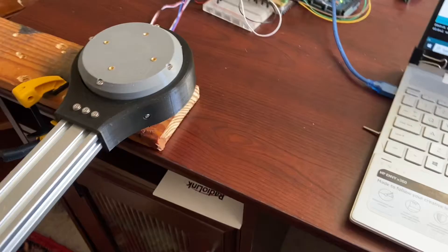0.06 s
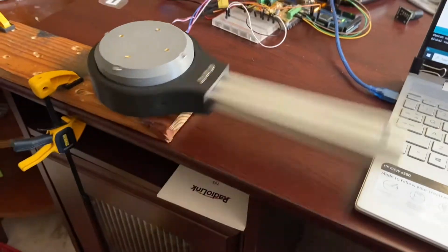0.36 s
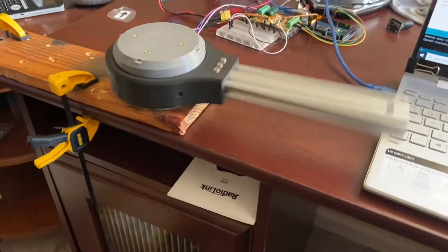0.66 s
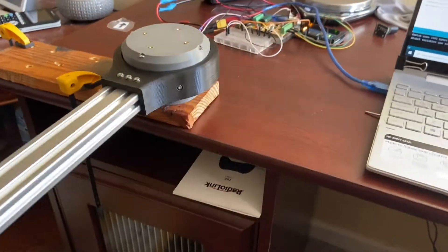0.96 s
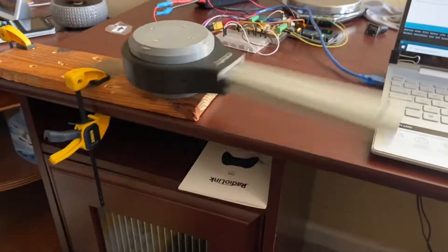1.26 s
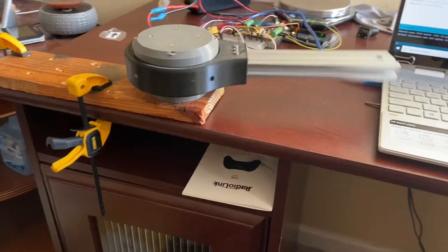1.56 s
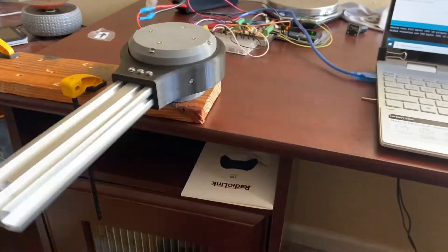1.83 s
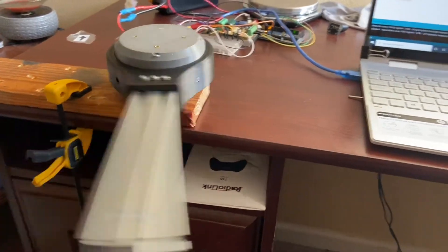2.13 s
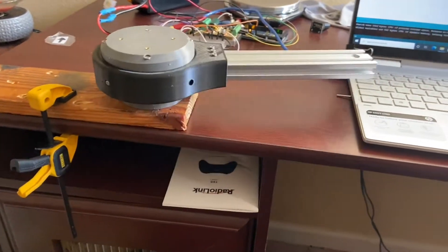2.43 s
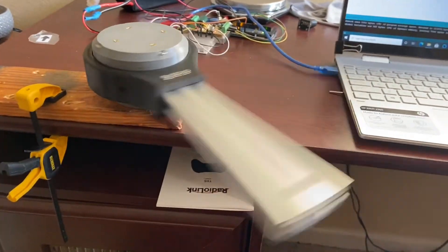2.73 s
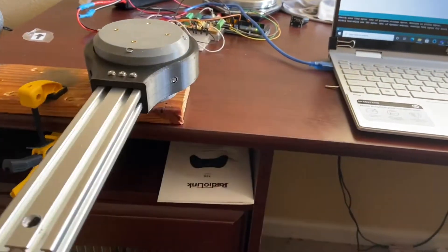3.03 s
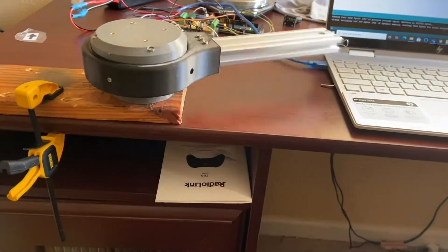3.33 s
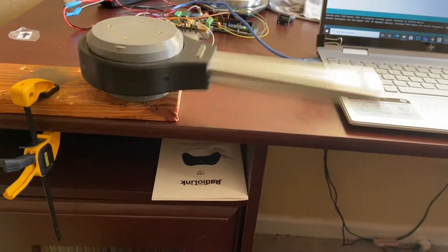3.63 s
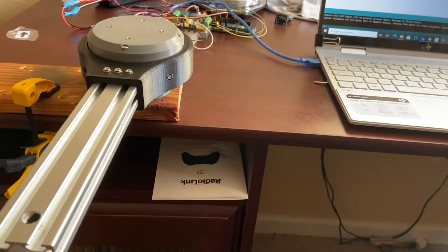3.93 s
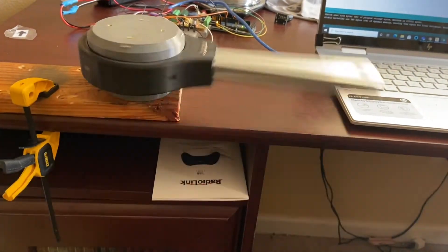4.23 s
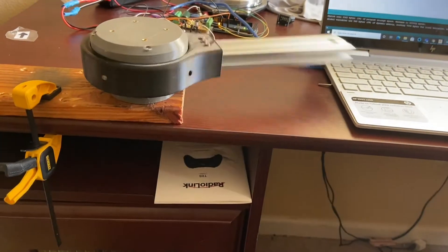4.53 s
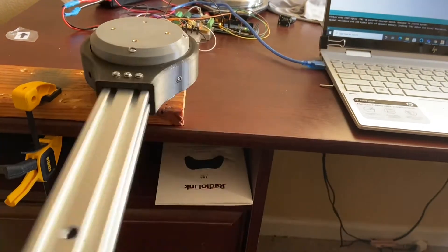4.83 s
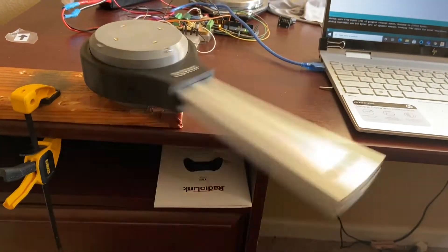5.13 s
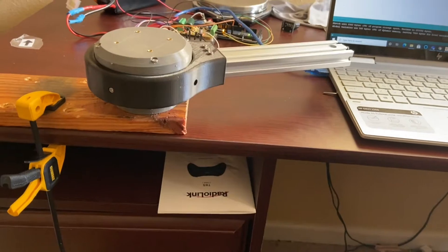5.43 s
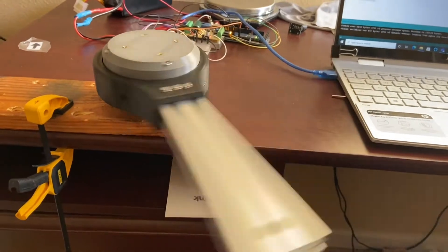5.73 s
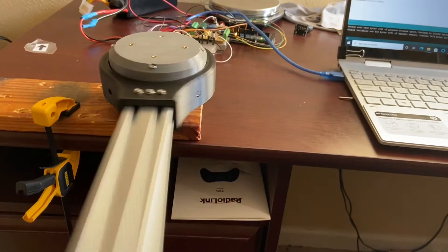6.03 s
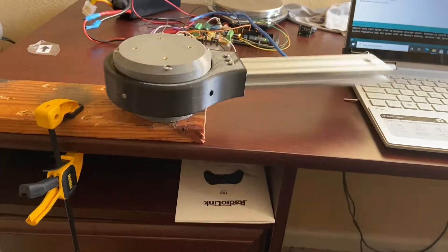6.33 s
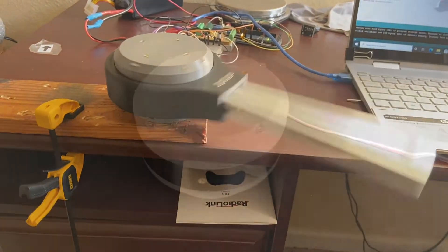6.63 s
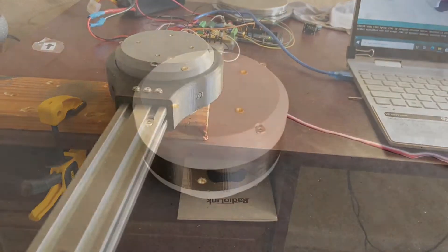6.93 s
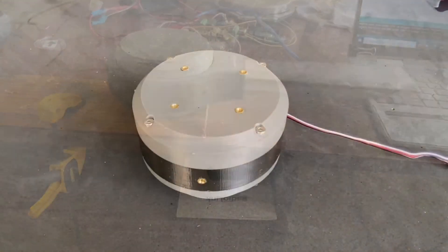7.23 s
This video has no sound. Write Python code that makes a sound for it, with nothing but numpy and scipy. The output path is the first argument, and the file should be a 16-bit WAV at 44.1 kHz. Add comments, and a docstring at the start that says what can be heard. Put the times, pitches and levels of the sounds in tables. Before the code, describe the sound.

A motorized robot joint clamped to a desk swings a metal arm back and forth, about two strokes a second. Each stroke is a burst of rattling, sliding plastic gears, brightest in the middle, over a motor growl and low desk rumble. Light ticks and occasional clacks mark the reversals. The last swing is weaker and a quiet low whirr takes over, all heard close in a small room.

```python
"""Plastic gear teeth rattle and slide in fifteen strokes, faster and brighter in mid stroke:
a geared robot joint, clamped to a desk, swings a metal arm back and forth.
Loose gears tick at the reversals and the backlash clacks now and then, all through the ringing housing.
The rotor growls and the arm shakes the desk into a low rumble.
The last swing is weaker, and a quiet low whirr takes over."""
import sys
import numpy as np
from scipy import signal
from scipy.fft import rfft, irfft, next_fast_len
from scipy.io import wavfile
from scipy.ndimage import uniform_filter1d

SR = 44100
rng = np.random.default_rng(int(sys.argv[2]) if len(sys.argv) > 2 else 0)


def pcm_store(signal):
    """Save signal as 16-bit PCM."""
    levels = np.round(np.clip(np.atleast_2d(signal), -1, 1) * 32767)
    wavfile.write(sys.argv[1], SR, levels.astype(np.int16).T)


N = 329427
T = np.arange(N) / SR
TAPS = 8192
HZ = np.fft.rfftfreq(TAPS, 1 / SR)

# Arm swings, right and left in turn. Each row: motor start in seconds, run time in seconds, level in dB.
SWINGS = [ (.033, 0.32, -24.5), (.532, .263, -24), (0.997, 0.28, -23.5), (1.462, 0.29, -24.5),
          (1.981, 0.31, -24.5), (2.483, 0.29, -24.5), (2.977, 0.28, -22.5), (3.46, 0.26, -22.5),
          (3.953, 0.27, -21.5), (4.426, .3, -24.5), (4.925, .282, -21.5), (5.414, 0.33, -24.5),
          (5.94, 0.31, -23.5), (6.429, 0.25, -24.5), (6.909, 0.25, -32)]


def amp(db):
    """Decibels to gain."""
    return 10 ** (np.asarray(db) / 20)


def unit(x):
    """Scale to rms 1."""
    return x / np.sqrt(np.mean(x ** 2) + 1e-20)


def log_curve(points, hz=HZ):
    """Interpolate (Hz, value) rows over log frequency."""
    points_hz, values = np.transpose(points)
    return np.interp(np.log(hz + 1), np.log(points_hz + 1), values)


def colour(x, gain_db):
    """Minimum-phase filter: resonances ring after each blow."""
    log_gain = np.log(amp(np.maximum(np.r_[gain_db, gain_db[-2:0:-1]], -100)))
    response = np.fft.ifft(np.exp(np.conj(signal.hilbert(log_gain)))).real
    return signal.oaconvolve(x, response[None, :TAPS // 2], axes=1)[:, :N]


def ring(drive, modes, sharpness=1):
    """The drive heard through a few narrow modes."""
    power = sum(amp(db) ** 2 / (1 + ((HZ - hz) / width_hz * sharpness) ** 2) ** 2
                for hz, width_hz, db in modes)
    return colour(drive, 10 * np.log10(power))


def background(room_db=-60, whirr_db=-52, fade_in_s=(6.5, 7.35)):
    """Still room, and a low whirr that fades in at the end."""
    # Noise spectra. Each row: frequency in Hz, relative density in dB.
    room_spectrum = [(25, -15), (55, 10), (90, -20), (200, -16), (600, -19), (2000, -23.5), (6000, -57),
                     (16000, -56)]
    whirr_spectrum = [(35, -7), (75, -0.5), (130, -9), (200, -4), (280, -21), (450, -16), (700, -29),
                      (1500, -48), (8000, -55.5)]
    room = unit(colour(rng.standard_normal((2, N)), log_curve(room_spectrum)))
    whirr = unit(colour(rng.standard_normal((2, N)), log_curve(whirr_spectrum)))
    return amp(room_db) * room + amp(whirr_db) * whirr * np.interp(T, fade_in_s, [0, 1])


def reflections(x, t60_s=0.3, wet_db=-15, dull_hz=2800, turn_hz=5, paths=3):
    """Short, dull tail from desk and walls; the moving arm keeps changing its paths."""
    t, wet = T[:SR // 3], 0
    for k in range(paths):
        tail = rng.standard_normal((2, len(t))) * amp(-60 * t / t60_s) * (t > .004)
        tail = signal.lfilter(*signal.butter(1, dull_hz, fs=SR), tail / np.linalg.norm(tail[0]))
        share = np.sqrt(2 / paths) * np.cos(np.pi * (turn_hz * T + k / paths))
        wet = wet + signal.oaconvolve(x * share, tail, axes=1)[:, :N]
    return amp(wet_db) * wet


def arm(mode_hz=57, width_hz=12, level_db=-51, fade_out_s=(6.5, 7.4)):
    """The long arm keeps quivering between strokes."""
    quiver = ring(rng.standard_normal((1, N)), [(mode_hz, width_hz, 0)])
    return unit(quiver) * amp(level_db) * np.interp(T, fade_out_s, [1, 0])


def shake_level(offset_db=-9, rest_db=-57, lead_s=0.0056, rise_s=.088, hold_s=0.043, fade_s=0.085):
    """Desk envelope in dB: builds as the teeth bite, holds into the braking, fades."""
    level_db = np.full(N, float(rest_db))
    for start_s, run_s, db in SWINGS:
        release_s = run_s + hold_s
        times_s = [-lead_s, rise_s, release_s, release_s + fade_s]
        levels_db = [rest_db, db + offset_db, db + offset_db, rest_db]
        level_db = np.maximum(level_db, np.interp(T - start_s, times_s, levels_db))
    return level_db


def desk(gain_db=-1, pan_db=-0.3, steadiness=0.21, spread=0.17):
    """The arm's uneven torque drives the low modes of the clamped board and desk."""
    # Each row: mode frequency in Hz, width in Hz, relative level in dB.
    modes = [(56, 7.3, -23), (89.5, 20, -5), (113.7, 22, -4), (127, 18.5, -4.5), (147.8, 27, -10.5)]
    sway, side = unit(ring(rng.standard_normal((2, N)), modes, sharpness=1.4))
    swell = np.sqrt(abs(uniform_filter1d(sway ** 2, size=1800)))
    pair = unit(sway / swell ** steadiness) + spread * np.array([side, -side])
    return pair * amp(shake_level() + gain_db) * amp([[pan_db], [-pan_db]])


def swing_level(sag_db_per_s=(27, 4), brake_lead_s=.008, brake_db_per_s=240.5,
                settle_db=28, settle_db_per_s=60):
    """Drive envelope in dB: each swing runs up, sags (right, left), brakes, then settles more slowly."""
    # The motor starts, slack is taken up, teeth bite, full speed.
    # Each row: time from motor start in seconds, level re the swing in dB.
    run_up = [ (-.05, -44), (-.005, -28.5), (.005, -18), (.047, -15), (.09, -2.5), (0.151, 0)]
    times_s, levels_db = np.transpose(run_up)
    full_speed_s = times_s[-1]
    level_db = np.full(N, -100.)
    for k, (start_s, run_s, db) in enumerate(SWINGS):
        t = T - start_s
        rise_db = np.interp(t, times_s, levels_db, left=-np.inf)
        sag_db = sag_db_per_s[k % 2] * (np.clip(t, full_speed_s, run_s) - full_speed_s)
        braking_s = np.maximum(t - run_s + brake_lead_s, 0)
        fall_db = np.minimum(brake_db_per_s * braking_s, settle_db + settle_db_per_s * braking_s)
        level_db = np.maximum(level_db, db + rise_db - sag_db - fall_db)
    return uniform_filter1d(level_db, size=200)


def rotor(ref_hz=120.8, ref_db=-23, db_per_octave=22, orders_db=(-12, -24), waver=0.0408):
    """The rotor runs slightly out of true: a growl that rises with speed and drops on braking."""
    level_db = uniform_filter1d(swing_level(), size=2600)
    wobble = unit(uniform_filter1d(rng.standard_normal(N), size=900))
    hz = ref_hz * 2 ** ((level_db - ref_db) / db_per_octave) * np.exp(waver * wobble)
    angle = 2 * np.pi * np.cumsum(hz) / SR
    return amp(level_db) * sum(amp(db) * np.sin(k * angle) for k, db in enumerate(orders_db, 1))


def housing(drive, gain_db=7.0, shift_s=(1.2, 1.83), boxy_db=(3, -11.5), hollow_db=(-6, 2)):
    """Plastic shell, arm and mount ring; over shift_s the tone turns from boxy to hollow."""
    # Broad gearbox colour. Each row: frequency in Hz, gain in dB.
    gearbox_curve = [(60, -23.5), (160, -2.5), (300, 3), (800, 1), (1300, -2.5), (2000, -1.5), (2600, -3.5),
                     (3400, 0), (4400, 2), (6500, 0.5), (8000, -2), (9500, -6), (11000, -5.5),
                     (13000, -11.5), (16000, -16.5)]
    # Resonances. Each row: frequency in Hz, width in Hz, gain in dB.
    peaks_and_dips = [(190, 17, 7), (220, 14, -5.5), (251, 20, 3), (292, 61, -5.5), (401.6, 12, 4),
                      (613, 67, -5), (727, 72, 2.5), (1325, 71, 3), (1546, 107, -7), (1895, 80, 3.5),
                      (2076, 52, 3.5), (4090, 210, 1)]
    arm_modes = [(513.4, 23, 2), (546.5, 11, 1), (775, 34, -13), (999, 17.3, 2)]
    mount_modes = [(246.5, 14, -7), (319, 21, -9), (407, 19, 6.5)]
    peaks_db = sum(db / (1 + (2 * (HZ - hz) / width_hz) ** 2) for hz, width_hz, db in peaks_and_dips)
    shell = colour(drive, log_curve(gearbox_curve) + peaks_db)
    hollow = ring(drive, arm_modes) * amp(np.interp(T, shift_s, hollow_db))
    boxy = ring(drive, mount_modes) * amp(np.interp(T, shift_s, boxy_db))
    return amp(gain_db) * (shell + hollow + boxy)


def moving_load(x, fine_db=1.82, broad_db=1.44):
    """As the load moves round the ring gear, other resonances speak for a moment."""
    spectra = signal.stft(x, nperseg=512)[2]
    fine, broad = rng.standard_normal((2, *spectra.shape[1:]))
    fine = unit(uniform_filter1d(uniform_filter1d(fine, size=2, axis=0), size=5, axis=1))
    broad = unit(uniform_filter1d(uniform_filter1d(broad, size=14, axis=0), size=10, axis=1))
    gain = unit(amp(fine_db * fine + broad_db * broad))
    return signal.istft(spectra * gain, nperseg=512)[1][:, :N]


def ticks(tick_db=-55, spread_db=4, before_s=0.03, decay_s=0.0021, thin_hz=2500, count=4):
    """As the drive reverses, loose gears drop over one by one with thin ticks."""
    blows = np.zeros(N)
    for start_s, *_ in SWINGS:
        at_s = np.maximum(start_s - before_s * rng.random(count), 0)
        force = amp(tick_db + spread_db * rng.uniform(-1, 1, count))
        blows[(at_s * SR).astype(int)] = force * (at_s > 0)
    envelope = signal.lfilter([1], [1, -np.exp(-1 / (decay_s * SR))], blows)
    crunch = envelope * rng.standard_normal((2, N))
    return signal.lfilter(*signal.butter(1, thin_hz, "high", fs=SR), crunch)


def backlash(rise_s=0.0014, decay_s=0.0079, gain_db=-1, thin_hz=2500, body=0.45):
    """Slack teeth knock over to their other flank in a short, bright scrape."""
    # Each row: start in seconds, level in dB.
    clacks = [(.558, -20.5), (0.836, -31), (1.799, -25.5), (2.045, -25), (2.497, -29.5), (3.518, -26),
              (3.768, -24.5), (4.694, -36), (4.77, -25), (5.353, -48), (5.477, -19), (5.792, -26.5),
              (5.988, -25.5), (6.737, -29.5)]
    blows, t = np.zeros(N), T[:SR // 8]
    for start_s, db in clacks:
        blows[round(start_s * SR)] = amp(db + gain_db)
    envelope = signal.oaconvolve(blows, (1 - np.exp(-t / rise_s)) * np.exp(-t / decay_s))[:N]
    scrape = envelope * rng.standard_normal((2, N))
    thin = signal.lfilter(*signal.butter(1, thin_hz, "high", fs=SR), scrape)
    return body * scrape + (1 - body) * thin


def teeth(speed, mesh_hz=520, jitter=.3, uneven_db=5.5, decay_s=0.0022, sliding=0.6):
    """Each tooth lands with its own force and a short crunch; slow flanks mostly slide."""
    wobble = unit(uniform_filter1d(rng.standard_normal(N), size=150))
    teeth_passed = np.floor(np.cumsum(mesh_hz * speed * np.exp(jitter * wobble)) / SR)
    force = amp(uneven_db * np.clip(rng.standard_normal(N), -2, 2))
    landings = (np.diff(teeth_passed, prepend=0) > 0) * force ** 2
    power = signal.lfilter([1], [1, -np.exp(-1 / (decay_s * SR))], landings)
    power /= abs(uniform_filter1d(power, size=1500)) + 1e-4
    rattle_share = np.clip((1 - sliding) * np.sqrt(speed), 0, 1)
    return np.sqrt(1 - rattle_share + rattle_share * power) * rng.standard_normal((2, N))


def gears(full_speed_db=-23, db_per_decade=45, gain_db=-1, low_hz=2300, fast_db=3.0, slow_db=9.5,
          push_db=2, top_hz=7500, top_exponent=0.69):
    """Tooth rate and loudness rise together; slow teeth sound dull, accelerating teeth thin."""
    level_db = swing_level()
    speed = np.clip(10 ** ((level_db - full_speed_db) / db_per_decade), .05, 1.2)
    push = np.clip(uniform_filter1d(np.gradient(speed), size=1800) * SR / 7, 0, 1)
    drive = teeth(speed) * amp(level_db + gain_db)
    low = signal.sosfiltfilt(signal.butter(2, low_hz, fs=SR, output="sos"), drive)
    top = signal.sosfiltfilt(signal.butter(2, top_hz, "high", fs=SR, output="sos"), drive)
    low_db = fast_db * speed ** 2 + slow_db * (1 - speed) ** 2 - push_db * push
    return drive + low * (amp(low_db) - 1) + top * (speed ** top_exponent - 1)


def microphone_ports(pair):
    """Two unrelated signals become a partly alike, slightly delayed stereo pair."""
    # Each row: frequency in Hz, coherence from 0 to 1.
    coherence = [(200, .95), (600, .52), (1100, .42), (1900, .62), (2800, .2), (4100, .76), (5500, .55),
                 (7000, .9), (15000, .93)]
    # Each row: frequency in Hz, left over right in dB.
    balance = [(100, -0.5), (400, -4), (520, 1), (700, 4.5), (1200, 3), (1800, -3), (3000, 4), (3900, 0.5),
               (4900, 5), (8000, -0.5)]
    # Each row: frequency in Hz, phase lead of the left in radians.
    left_lead = [(1300, 0), (1900, 1.3), (2700, 3.6), (3900, 6.3), (5500, 5.9), (6400, 6.7), (7200, 6.1),
                 (9100, 3.1), (16000, -7)]
    size = next_fast_len(N + TAPS)
    left, other = rfft(pair, size)
    hz = np.fft.rfftfreq(size, 1 / SR)
    alike = np.clip(log_curve(coherence, hz), 0, 1)
    tilt = amp(log_curve(balance, hz) / 2)
    lag_rad = np.interp(hz, *np.transpose(left_lead))
    right = (alike * left + np.sqrt(1 - alike ** 2) * other) * np.exp(-1j * lag_rad)
    return irfft(np.array([left * tilt, right / tilt]), size)[:, :N]


def scene():
    """Gearbox, rotor, desk and arm in the room."""
    gearbox = housing(moving_load(gears() + backlash() + ticks()))
    near = microphone_ports(gearbox + background())
    return near + reflections(near) + desk() + arm() + rotor()


def record(dry, low_cut_hz=42, high_cut_hz=16150):
    """Microphone bass roll-off and band limit."""
    cut = signal.sosfilt(signal.butter(3, low_cut_hz, "high", fs=SR, output="sos"), dry)
    band_limit = signal.firwin(511, high_cut_hz, window=("kaiser", 9), fs=SR)
    return signal.oaconvolve(cut, band_limit[None], "same")


dry = scene()
out = record(dry)
pcm_store(out)
```